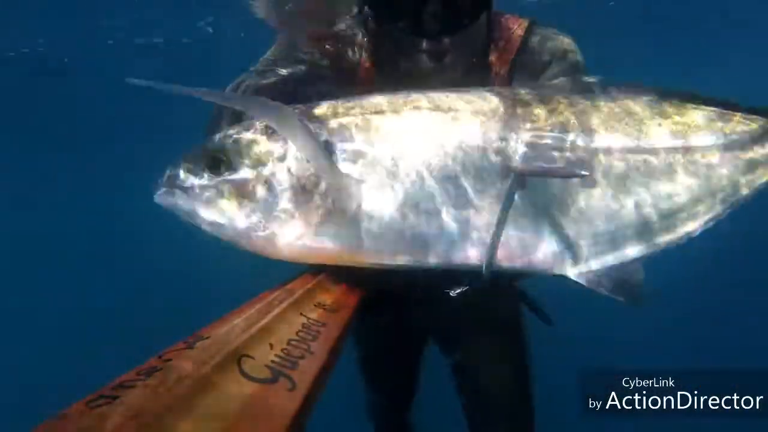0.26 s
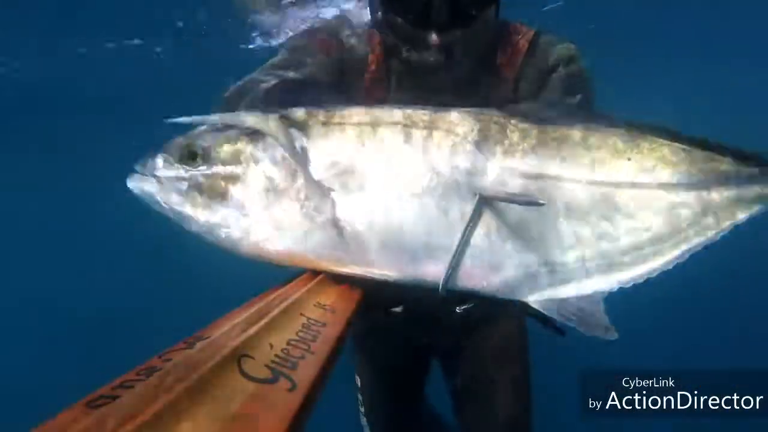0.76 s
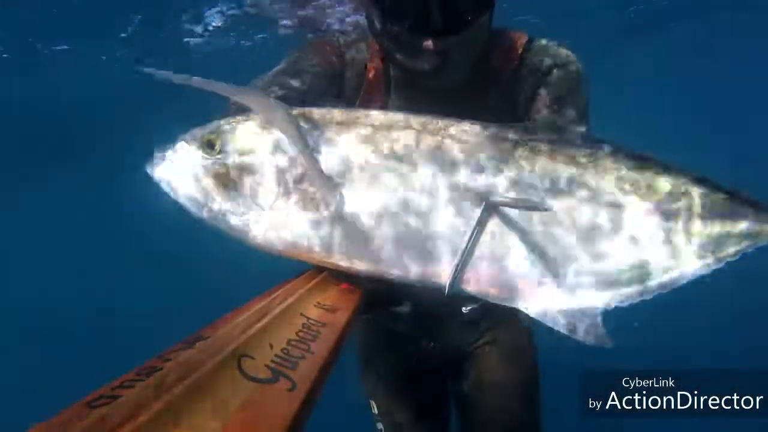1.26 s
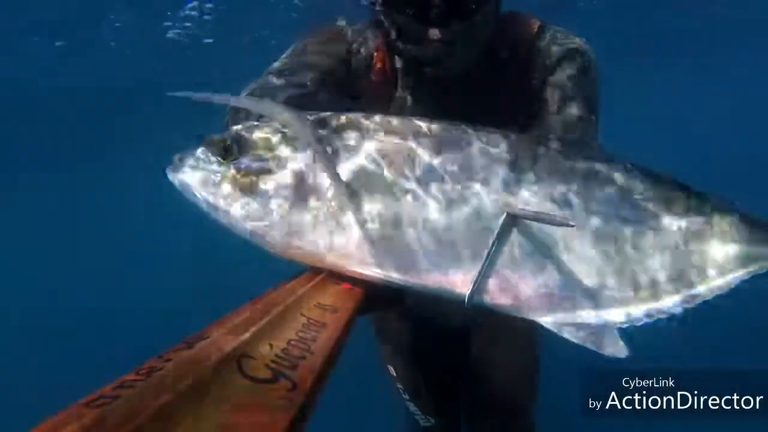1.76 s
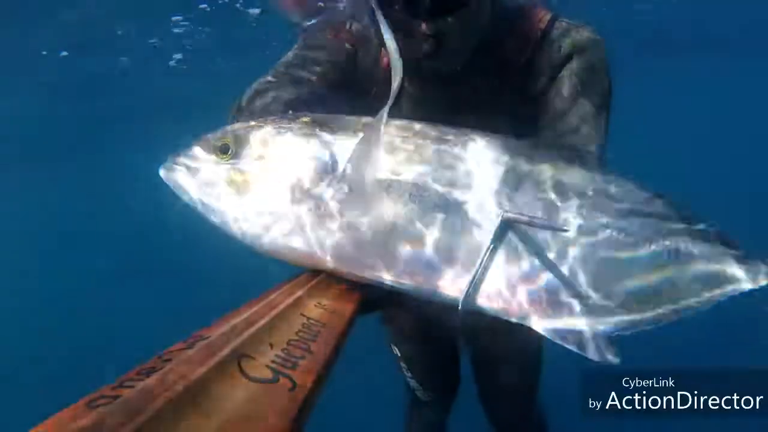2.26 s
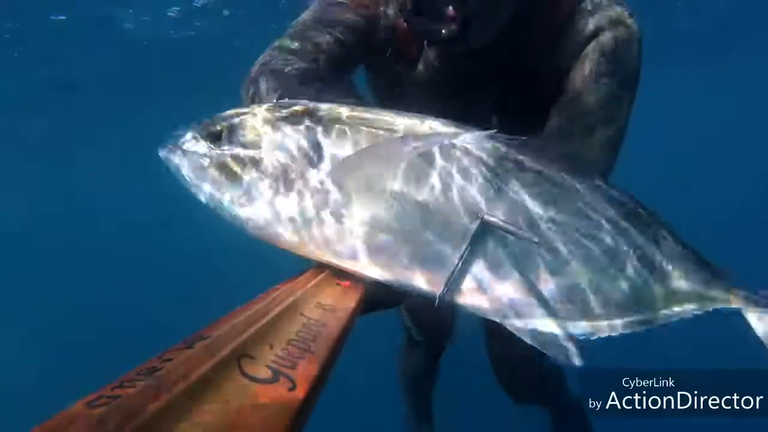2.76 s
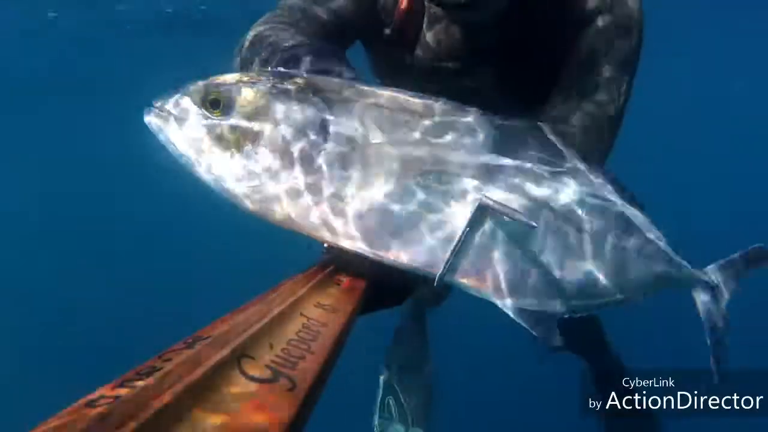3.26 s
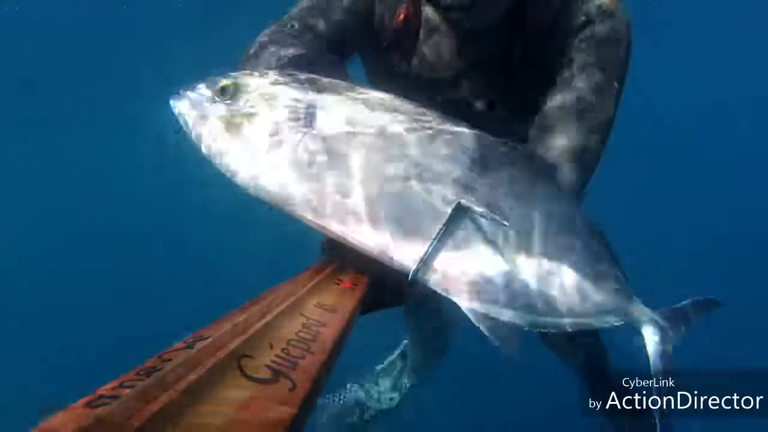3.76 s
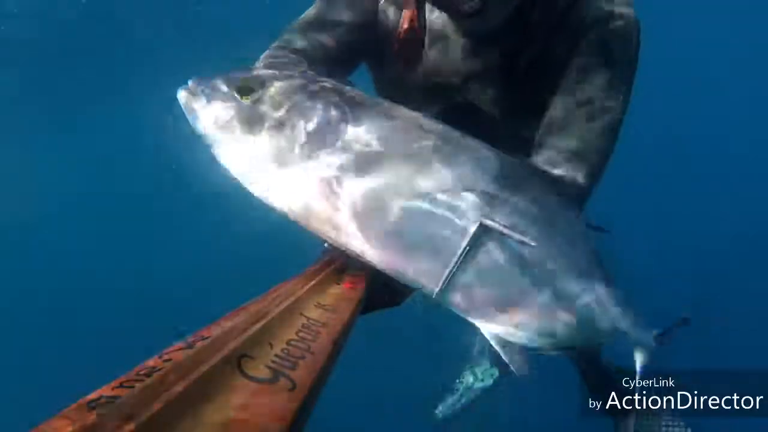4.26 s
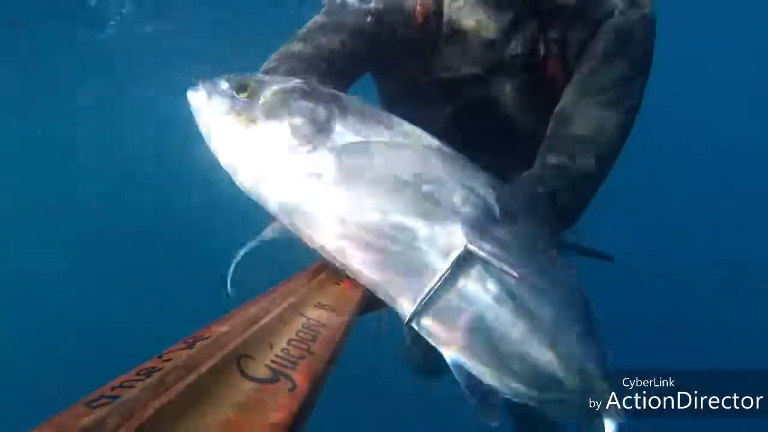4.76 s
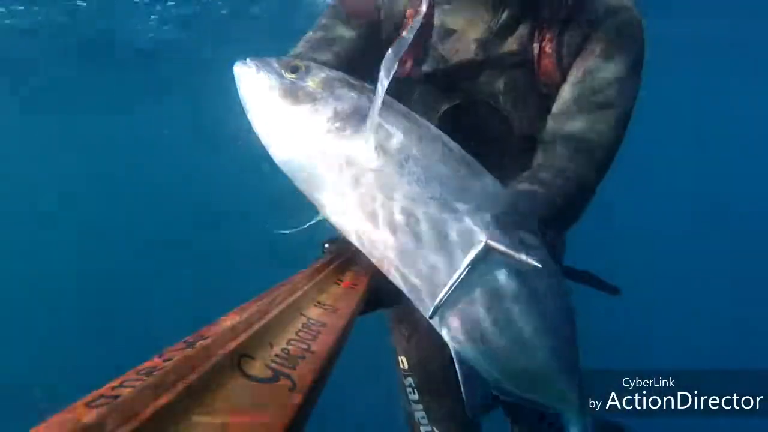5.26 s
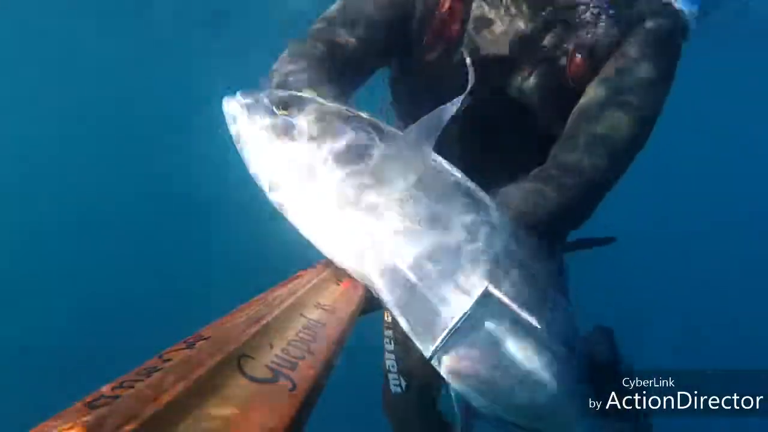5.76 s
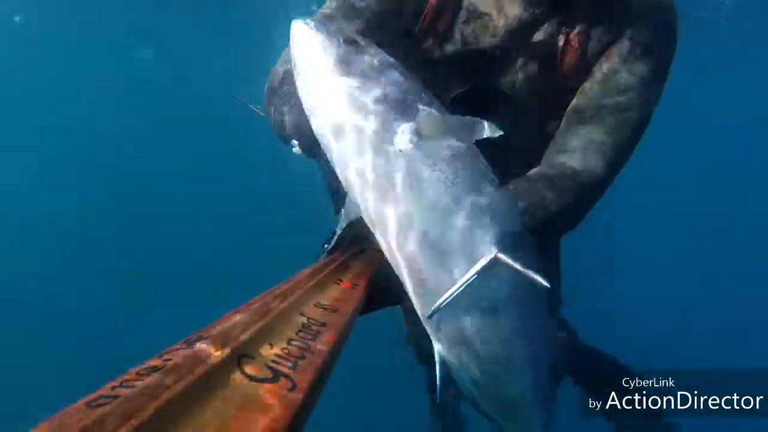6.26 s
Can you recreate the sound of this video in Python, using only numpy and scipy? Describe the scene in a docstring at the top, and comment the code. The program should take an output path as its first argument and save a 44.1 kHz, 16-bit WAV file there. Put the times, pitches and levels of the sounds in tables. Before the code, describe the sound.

Sharp shrimp clicks dot a deep, wavering underwater rumble, with brief squeaky scuffs and a few dull knocks of gear on wood.

```python
"""A sealed camera on a wooden shaft sits just under the sea surface while a diver turns a speared fish.
From the start the water hisses, three faint tones whine, the shaft sways and hums in the swell, and far
shrimp crackle. At once gear begins to rub, slip and jolt the shaft, and near shrimp snap, making the
camera housing ring; both go on throughout. Between 1.5 and 4 s gear knocks dully on the wood five times,
with a bright tick on the knock at 2.78 s. The loudest snap comes near 5.5 s."""
import sys
import numpy as np
from scipy import signal
from scipy.fft import rfft, irfft
from scipy.io import wavfile
from scipy.ndimage import uniform_filter1d

SR = 44100
rng = np.random.default_rng(int(sys.argv[2]) if len(sys.argv) > 2 else 0)


def transcribe(signal):
    """Save signal, clipped to [-1, 1], as a 16-bit WAV file at the path in sys.argv[1]."""
    frames = np.atleast_2d(signal).T
    limited = np.clip(frames, -1, 1)
    pcm = np.round(limited * 32767).astype(np.int16)
    wavfile.write(sys.argv[1], SR, pcm)


N = 287091   # samples, about 6.5 s


def from_db(db):
    """Turn decibels into a number to multiply by."""
    return 10 ** (np.asarray(db) / 20)


def unit_level(x):
    """Scale a sound so its average strength (rms) is 1."""
    return x / np.sqrt(np.mean(x ** 2) + 1e-20)


def resonance(x, hz, width_hz):
    """Let through only the sound close to one pitch."""
    r = np.exp(-np.pi * width_hz / SR)
    feedback = [1, -2 * r * np.cos(2 * np.pi * hz / SR), r * r]
    return signal.lfilter([(1 - r * r) / 2, 0, (r * r - 1) / 2], feedback, x)


def ring(clicks, hz, fade_s):
    """Each click starts a tone that fades by 60 dB in fade_s."""
    r, w = from_db(-60 / (fade_s * SR)), 2 * np.pi * hz / SR
    return signal.lfilter([0, np.sin(w)], [1, -2 * r * np.cos(w), r * r], clicks + 1e-18)


def strikes(times, db):
    """Place single clicks at the given times and levels."""
    clicks = np.zeros(N)
    np.add.at(clicks, np.round(np.asarray(times) * SR).astype(int), from_db(db))
    return clicks


# How strong the wash is from low to high: f/Hz, relative level/dB
WASH_COLOUR = [(8.8, -43), (15, 7.5), (46, -6.5), (239, -17.5), (1040, -24.5), (2200, -27), (3300, -32.5),
               (3920, -30), (4270, -36), (5080, -29), (5900, -30), (6500, -22.5), (7300, -27),
               (9310, -32.5), (10400, -41.5), (12400, -39), (14800, -55)]

def water(level_db=-53.5):
    """The sea's steady wash, coloured by the housing, with the microphone's hiss."""
    hz, db = np.transpose(WASH_COLOUR)
    all_hz = np.maximum(np.fft.rfftfreq(N, 1 / SR), 1)
    colour = from_db(np.interp(np.log(all_hz), np.log(hz), db))
    wash = irfft(rfft(rng.standard_normal(N)) * colour, N)
    return from_db(level_db) * unit_level(wash)


# The tones of the whine: f/Hz, level/dB
WHINE_TONES = [(722, -80), (843, -78), (964, -100)]

def whine():
    """Three faint, slightly unsteady tones."""
    return sum(from_db(db) * unit_level(resonance(rng.standard_normal(N), hz, width_hz=2.4))
               for hz, db in WHINE_TONES)


# How hard the swell rocks the shaft: t/s, level/dB
SWELL_LEVELS = [(0, -44.5), (.15, -43.5), (.7, -46), (.95, -56), (1.08, -47.5), (1.3, -67.5), (1.55, -51),
                (1.68, -59), (1.85, -47), (2.1, -49.5), (2.3, -60), (2.65, -47.5), (2.85, -48), (3.0, -54),
                (3.6, -50.5), (3.85, -48), (4.0, -43), (4.5, -46.5), (4.62, -54), (4.87, -39), (5.0, -60.5),
                (5.3, -47.5), (5.48, -54), (5.86, -44), (6.2, -52), (6.51, -58)]

def sway(hz=34.07, width_hz=8.1):
    """Water pushes the shaft to and fro, making a deep, wavering rumble."""
    times, db = np.transpose(SWELL_LEVELS)
    push = rng.standard_normal(N + SR)   # one spare second lets the motion build up
    rumble = resonance(resonance(push, hz, width_hz), hz, width_hz)[SR:]
    rumble /= np.sqrt(uniform_filter1d(rumble ** 2, 5000))   # even it out: the swell sets the level
    return from_db(np.interp(np.arange(N) / SR, times, db)) * rumble


# The shaft's own notes: f/Hz, width/Hz, relative level/dB
SHAFT_NOTES = [(95.7, 7.2, 0), (115.8, 11.5, -4.5), (311, 30, -16)]

def hum(level_db=-64.5):
    """Moving water keeps the shaft's notes sounding faintly."""
    push = rng.standard_normal(N + SR)
    return sum(from_db(level_db + db) * unit_level(resonance(push, hz, width)[SR:])
               for hz, width, db in SHAFT_NOTES)


def far_shrimp(snaps_per_s=350, weakest_db=-64.5):
    """Distant shrimp click at random, most of them weakly."""
    snapping = rng.random(N) < snaps_per_s / SR
    db = weakest_db + 3.85 * np.minimum(rng.exponential(1, N), 3.8)
    return snapping * from_db(db) * rng.choice([-1, 1], N)


# Gear rubs, then slips: slip t/s, rub length/s, squeak level/dB, scuff level/dB, jolt level/dB
GEAR_SLIPS = [(0.026, 0.025, -52, -46, -43.5), (0.09, 0.036, -61.5, -58, -53), (0.16, 0.087, -61, -53, -52),
              (0.219, 0.045, -54, -50.5, -39), (0.256, 0.0496, -59.5, -54, -46.5),
              (0.994, .015, -76.5, -66, -48.5), (1.143, .015, -66, -62, -55),
              (1.539, 0.0134, -63.5, -60, -53.5), (1.71, 0.022, -60, -59, -51.5),
              (1.809, 0.022, -55.5, -48, -47), (2.106, .014, -49, -44.5, -46.5),
              (2.198, 0.023, -66, -52.5, -51), (2.535, 0.017, -64, -62.5, -50.5),
              (3.099, 0.012, -44.5, -59, -55), (3.226, 0.012, -46, -48, -53),
              (3.436, 0.0109, -47.5, -58, -54), (3.522, 0.0078, -54, -50.5, -46.5),
              (3.629, 0.021, -46, -43.5, -46), (4.602, .045, -53.5, -53.5, -55),
              (4.707, 0.035, -47, -51, -56.5), (4.793, 0.048, -44.5, -44.5, -41),
              (5.094, 0.053, -53, -51.5, -47), (5.111, 0.011, -49, -59, -47),
              (5.62, .03, -61.5, -58, -48.5), (5.838, 0.0149, -55, -46, -43.5),
              (5.967, 0.038, -52, -52, -47), (6.09, 0.0163, -66, -65, -53.5), (6.2, 0.006, -71, -70.5, -57)]

def rubs(fade_share=0.37):
    """Gear drags on the mount: friction makes a high squeak and a low scuff that outlasts the slip."""
    squeak, scuff = np.zeros((2, N))
    for slip_s, length_s, squeak_db, scuff_db, _ in GEAR_SLIPS:
        size = round(length_s * SR)
        stroke = np.interp(np.arange(size) / size, [0, 1 - fade_share, 1], [0, 1, 0])
        start = round(slip_s * SR) - size
        squeak[start:start + size] += from_db(squeak_db) * stroke
        scuff[start:start + 2 * size] += from_db(scuff_db) * np.repeat(stroke[::-1], 2) ** 1.93
    return friction(squeak, hz=2172.3, width_hz=174) + friction(scuff, hz=256, width_hz=300)


def friction(strength, hz, width_hz):
    """Rubbing noise, narrowed around one pitch."""
    noise = strength * rng.standard_normal(N)
    boost = np.sqrt(SR / np.pi / width_hz)   # makes up for the narrowing
    return boost * resonance(resonance(noise, hz, width_hz), hz, width_hz)


def jolts(jolt_s=0.01, lowest_hz=88):
    """Each slip jerks the shaft and sets its notes ringing."""
    times, jolt_db = np.transpose(GEAR_SLIPS)[[0, -1]]
    push_pull = np.gradient(np.hanning(round(jolt_s * SR))) / 2
    force = np.convolve(strikes(times, jolt_db), push_pull)[:N]
    bass_cut = signal.butter(2, lowest_hz, "high", fs=SR, output="sos")   # too brief to cause sway
    force = signal.sosfilt(bass_cut, force + 1e-18)
    return sum(from_db(db) * SR / (np.pi * width) * resonance(force, hz, width)
               for hz, width, db in SHAFT_NOTES)


# Near snaps, plus the bright tick of the gear knock at 2.78 s:
# t/s, level/dB, extra level/dB for the housing's low notes, the same for its top notes
NEAR_CLICKS = [(0.0272, -40.5, -8, -14.5), (0.1923, -53, -8, -8.5), (0.2074, -32.5, -16, -15),
               (0.216, -40, -12, -3.5), (0.235, -42, -10, -12), (0.4146, -46, -27.5, -1.5),
               (0.5711, -34.5, -13.5, -14.5), (0.636, -33.5, -13.5, -7.5), (0.6996, -41.5, -10, -20),
               (0.7208, -43.5, -10, -1.6), (0.743, -40.5, -12, -24), (0.8676, -36.5, -21, -13),
               (0.8948, -35, -22.5, -12.5), (1.011, -47, -15, 0.5), (1.0647, -33.5, -15, -8.5),
               (1.2458, -25, -12, -20), (1.2805, -48, -16, -1), (1.5399, -44.5, -13, -8),
               (1.6066, -44.5, -10.5, -5), (1.501, -45, -24, -8.5), (1.6742, -30.5, -20, -21.5),
               (1.711, -47, -13, -2.66), (1.734, -38.5, -19, -18), (1.842, -49.5, -3, -7),
               (1.9693, -29, -13.5, -17), (2.0443, -54, -14.5, -2.2), (2.124, -50, -6, -6.5),
               (2.1539, -52, -16.5, 0.5), (2.18, -46, -15, -16.5), (2.2235, -36.5, -20.5, -9),
               (2.369, -47.5, -13, -2.5), (2.4423, -44, -11, -14), (2.4957, -35, -13, -11),
               (2.5237, -45.5, -20.5, -8), (2.538, -42.5, -15, -11.5), (2.7248, -37, -19, -16),
               (2.778, -41, -13, -9), (2.869, -39, -10.5, -23), (2.9086, -38.5, -21, -17),
               (2.978, -46.5, -28, -17), (3.2069, -45.5, -7, -8), (3.241, -33.5, -21, -15),
               (3.3661, -41.5, -17, -10.5), (3.372, -45, -8, -4.5), (3.3936, -46.5, -35, -15),
               (3.421, -36, -40.5, -13.5), (3.537, -49, -22, -2.5), (3.561, -25.5, -22.5, -17),
               (3.579, -42, -7, -13), (3.59, -47, -11, -7.5), (3.753, -33.5, -17, -11),
               (3.8534, -38.5, -6, -12.5), (3.896, -40, -13.5, -15), (3.945, -48.5, -11, -9.5),
               (3.9574, -40.5, -8.5, -9), (4.0086, -46, -15, -11), (4.139, -43.5, -10.5, -23),
               (4.413, -25, -18.5, -21.5), (4.4766, -42, 2, -8), (4.7047, -38, -15, -7.5),
               (4.753, -51.5, -3, 0), (4.787, -36, -12.5, -14.5), (5.0244, -33.5, -16.5, -15),
               (5.1503, -46.5, -14.5, -9), (5.205, -42, -10, -4.5), (5.2383, -29.5, -19.5, -17),
               (5.281, -44, -21, -6.5), (5.4105, -51.5, -12.5, -7), (5.4628, -14, -16.5, -19.5),
               (5.4898, -50, -2, -8.5), (5.5546, -35.5, -10, -15), (5.7188, -38.5, -29, -11),
               (5.752, -48, -18, -3.5), (5.825, -39.5, -22, -27), (5.9388, -49, -15, -12),
               (6.0202, -55.5, -20, -0.5), (6.0796, -46, -33, -23.5), (6.131, -50.5, -21.5, -8),
               (6.302, -47, -27, -9.5), (6.3381, -41.5, -11.5, -9), (6.3802, -33.5, -13, -14),
               (6.445, -44, -23.5, -6.5), (6.466, -38.5, -36, -6.5)]
# The housing's own notes: f/Hz, relative level/dB, fade time/s
HOUSING_NOTES = [(1469.2, -3, 0.026), (1790, 1, 0.012), (2187, 2, 0.019), (2864, 2, 0.015),
                 (3319, -5, 0.017), (3928, 3, 0.021), (4493, -4.5, 0.032), (4880, -4.5, 0.012),
                 (5226, 2, 0.012), (5740, -2.5, 0.0073), (6390, 8.5, 0.012), (7164, 8, 0.0096),
                 (9000, -0.5, 0.0086)]
# Borders between its low, middle, main and top notes: f/Hz
NOTE_BORDERS = [3200, 4600, 5900]

def snaps_and_tick(paths=4, spread_s=0.003, path_loss_db=8, wall_band_hz=(1210, 9100)):
    """Shrimp snaps and one gear tick ring the housing; direction decides which notes ring most."""
    times, click_db, low_db, top_db = np.transpose(NEAR_CLICKS)
    near_db = [low_db, -3.5 + 0.58 * low_db, 0, top_db]   # low, middle, main, top
    far_db = [-14, -26, -3, -14]
    chance_db = rng.normal(0, 1.7, (len(times), len(HOUSING_NOTES), paths))
    far = far_shrimp()
    # a near click arrives by several paths, the later ones weaker
    delays = np.c_[np.zeros(len(times)), np.sort(rng.uniform(0, spread_s, (len(times), paths - 1)))]
    ringing = np.zeros(N)
    for k, (hz, db, fade_s) in enumerate(HOUSING_NOTES):
        group = np.searchsorted(NOTE_BORDERS, hz)
        hit_db = click_db + near_db[group]
        near = sum(strikes(times + delays[:, p], hit_db + chance_db[:, k, p] - path_loss_db * p)
                   for p in range(paths))
        ringing += (-1) ** k * from_db(db) * ring(near + from_db(far_db[group]) * far, hz, fade_s)
    wall = signal.butter(4, wall_band_hz, "band", fs=SR, output="sos")   # what the housing lets in
    return signal.sosfilt(wall, with_echoes(ringing))


def with_echoes(clicks, echo_db=-39, fade_s=0.11):
    """The surface and bubbles add a dying spray of echoes to each click."""
    t = np.arange(1, 2000) / SR
    spray = from_db(echo_db - 60 * t / fade_s) * rng.standard_normal(len(t))
    return signal.fftconvolve(clicks, np.r_[1, spray])[:N]


# Blows on the shaft: t/s, level/dB
GEAR_KNOCKS = [(1.517, -43.5), (1.81, -37.5), (1.845, -45.5), (2.775, -36.5), (3.985, -38.5)]
# The notes of struck wood: f/Hz, relative level/dB, fade time/s
WOOD_NOTES = [(234, -6, 0.015), (854.6, -13.5, 0.068), (1200, -13, 0.0208), (1506, 4, 0.01135),
              (2000, -5, 0.022)]

def knocks(contact_s=0.00026):
    """Gear bumps the wood; each blow rings its notes in a slightly different mix."""
    times, blow_db = np.transpose(GEAR_KNOCKS)
    chance_db = rng.normal(0, 1.7, (len(times), len(WOOD_NOTES)))
    ringing = sum(ring(strikes(times, blow_db + db + chance_db[:, k]), hz, fade_s)
                  for k, (hz, db, fade_s) in enumerate(WOOD_NOTES))
    contact = np.hanning(round(contact_s * SR))   # a soft touch dulls the sound
    return np.convolve(ringing, contact / contact.sum())[:N]


def scene():
    """All the sounds add up at one microphone."""
    shaft = sway() + hum() + jolts()
    return (shaft + snaps_and_tick() + knocks() + rubs() + water() + whine())[None]


def record(dry):
    """The camera steeply cuts the treble, leaving almost nothing above 14900 Hz."""
    return signal.sosfilt(signal.cheby2(12, 60, 14900, fs=SR, output="sos"), dry)


dry = scene()
out = record(dry)
transcribe(out)
```